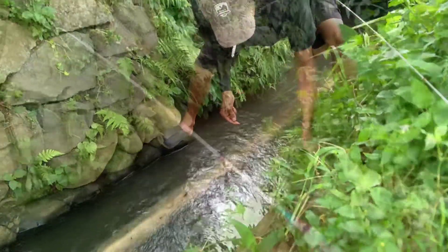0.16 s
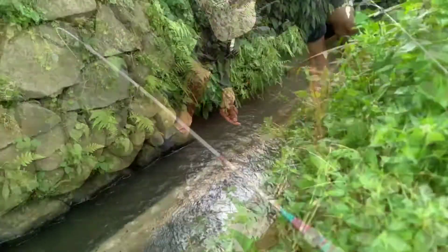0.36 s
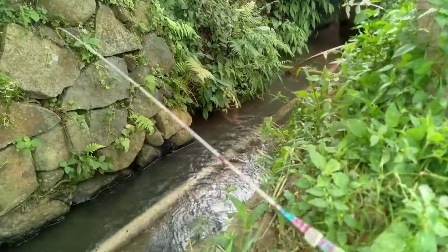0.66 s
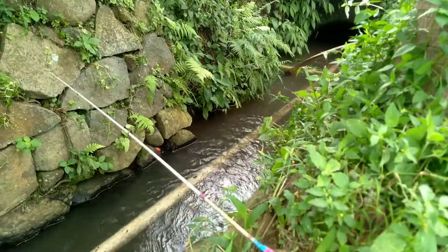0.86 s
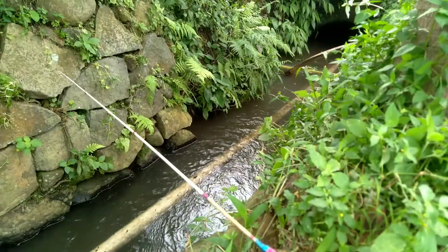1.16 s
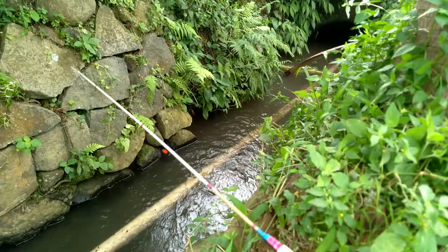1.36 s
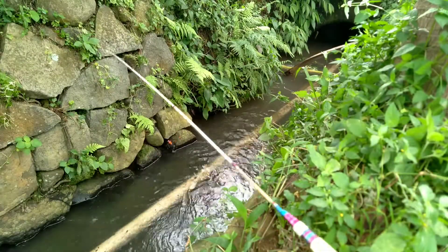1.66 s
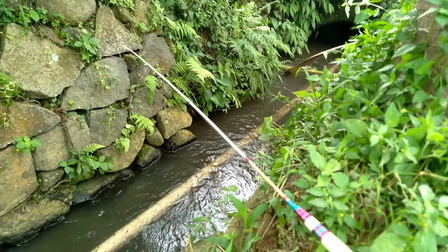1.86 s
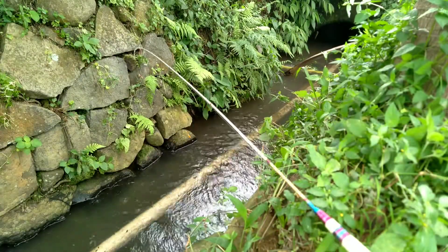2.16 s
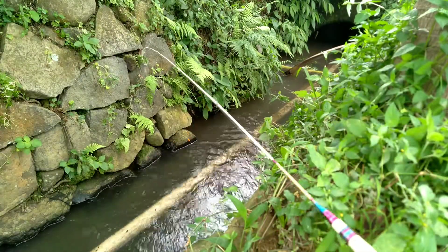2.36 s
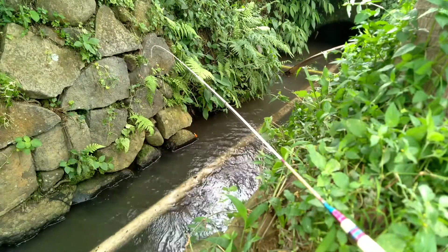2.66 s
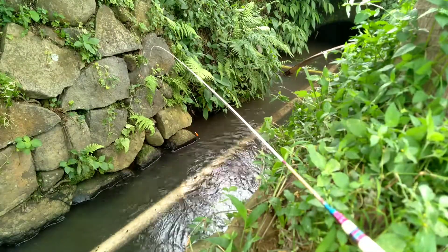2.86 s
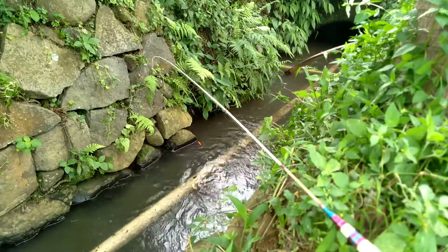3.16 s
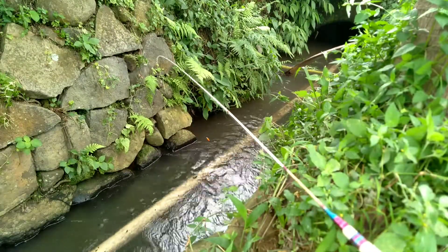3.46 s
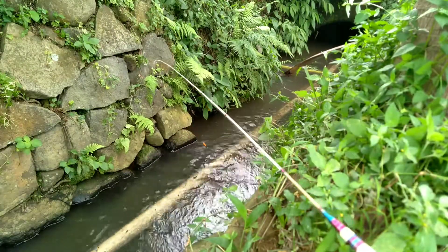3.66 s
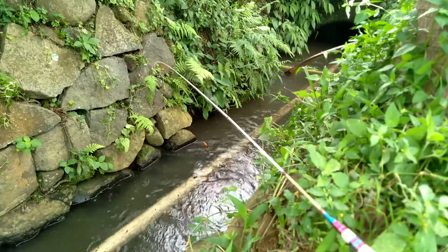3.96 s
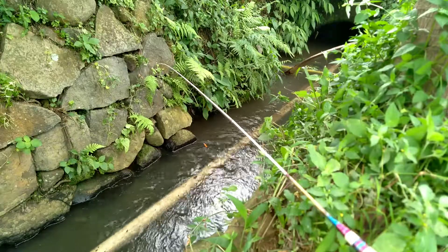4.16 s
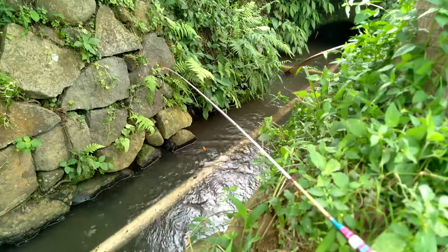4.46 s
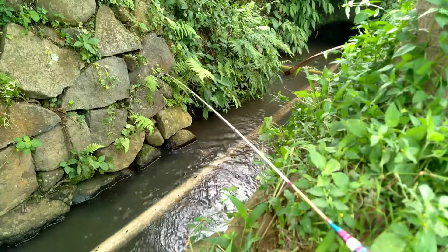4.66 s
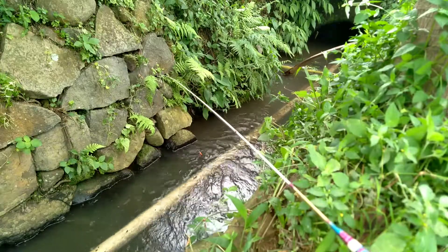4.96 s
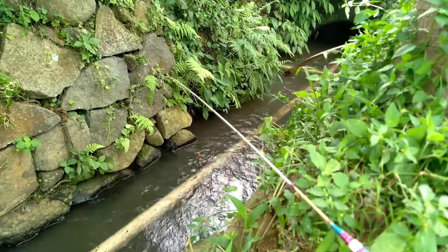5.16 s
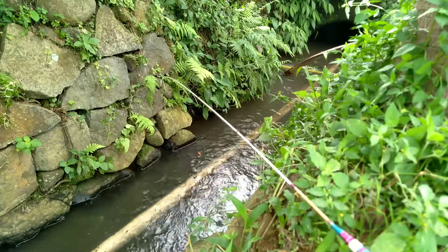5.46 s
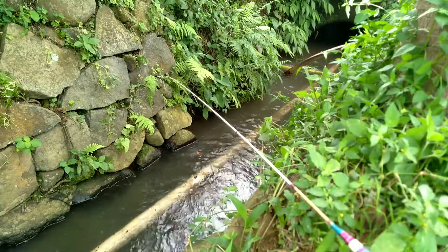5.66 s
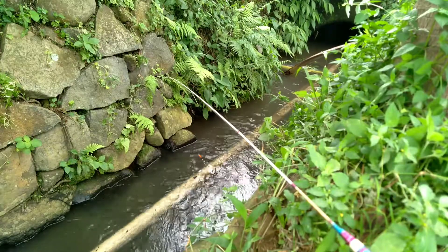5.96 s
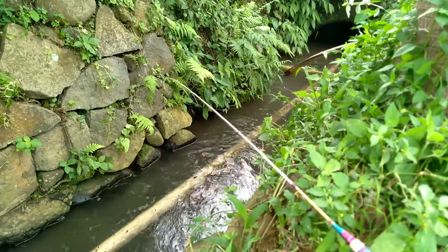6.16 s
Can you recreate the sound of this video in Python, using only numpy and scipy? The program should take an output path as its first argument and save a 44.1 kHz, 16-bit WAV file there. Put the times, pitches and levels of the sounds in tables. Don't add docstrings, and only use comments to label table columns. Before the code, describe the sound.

Outdoors at a stone-walled ditch, the sound fades in over a second: dense high cicada hiss, a constant thin electronic whine and dull, low water rumble. A hollow rod knocks against stone in a quick cluster just after one second. Faint drips, line ticks, distant peeps and two short falling bird whistles follow, while a far engine drone pulses weakly. The microphone is close to the rod, with the birds and engine far off.

```python
import sys
import numpy as np
from scipy import signal
from scipy.fft import rfft, irfft, next_fast_len
from scipy.io import wavfile
from scipy.ndimage import uniform_filter1d, map_coordinates

SR = 44100
rng = np.random.default_rng(int(sys.argv[2]) if len(sys.argv) > 2 else 0)


def transcribe(signal):
    frames = np.atleast_2d(signal).T
    limited = np.clip(frames, -1, 1)
    pcm = np.round(limited * 32767).astype(np.int16)
    wavfile.write(sys.argv[1], SR, pcm)


def voltage_ratio(decibels):
    exponent = np.asarray(decibels, float) / 20
    return 10 ** exponent


N = 278287
FADE_S = 1.01

# time_s, level_db
CICADA_LEVEL = [(0, -44), (.6, -41.5), (1.1, -42), (1.41, -44), (2.05, -41.5), (2.6, -41.5), (3.16, -42.5),
                (3.86, -41), (4.3, -44), (4.73, -41), (5.1, -41), (5.45, -41), (5.75, -42), (6.13, -40),
                (6.31, -42)]
# peak_s, strength_db
CICADA_CRESTS = [
    (-.2, 4.5),
    (1.1, 3.5),
    (2.36, 3),
    (3.66, 2.6),
    (4.98, 3),
    (6.2, 3),
]
# time_s, rumble_db
FLOW_SURGE = [(0, -48), (.4, -51), (.67, -48.5), (1.11, -53), (1.35, -49.5), (2.2, -49.5), (2.49, -52.5),
              (2.67, -49), (2.92, -51.5), (3.34, -47), (4.05, -51), (4.3, -44), (4.47, -52), (4.8, -49),
              (5.2, -50), (5.68, -49), (5.9, -51), (6.31, -50.5)]
# freq_hz, density_db
RUMBLE_SPECTRUM = [(12, -40), (20, -32.5), (32, -21.5), (81, -1), (119, 1.5), (141, -0.5), (162, -9),
                   (195, -12.5), (260, -22.5), (340, -51.5), (570, -120)]
# freq_hz, density_db
WASH_SPECTRUM = [(90, -73), (150, -2.5), (200, 0.5), (260, -5.5), (330, -16), (420, -29.5), (600, -63.5)]
# freq_hz, density_db
HISS_SPECTRUM = [(210, -40), (350, -9.5), (620, -10.5), (960, -11), (2000, -14.5), (4000, -16.5),
                 (5700, -18), (7000, -14.5), (7900, -12.5), (8500, -7.5), (10300, -23)]
# peak_s, length_s, level_over_wash_db
WASH_SWELLS = [(.25, 0.23, 15), (0.694, 0.31, 13.5), (1.225, .1, 13.5), (1.498, .3, 8.5), (1.95, .1, -1),
               (2.35, 0.41, 9.5), (3.35, 0.37, 4), (4.17, 0.11, 8.5), (5.3, 0.22, 4.5), (5.9, 0.25, 5)]
# start_s, blow_db, rattle_db, rattle_t60_s
ROD_KNOCKS = [
    (1.126, -30, -51.5, 0.24),
    (1.1482, -44, -57.5, 0.34),
    (1.2424, -26, -49.5, .3),
    (1.334, -40, -53.5, 0.23),
    (1.392, -47, -60.5, 0.24),
]
# centre_hz, width_hz, level_db
BUTT_MODES = [(272, 127, 3.5), (607, 420, -3.5), (1306, 330, -11.5), (3310, 150, -12), (3630, 210, -14),
              (4100, 120, -22), (4630, 210, -19), (4940, 63, -8.5), (5630, 210, -16.5), (6400, 420, -12),
              (7000, 270, -9), (8280, 130, 0), (8600, 200, -9)]
SHAFT_MODES = [(270, 210, -2), (407, 230, -1.5), (643, 330, 1), (1470, 490, -15), (2043, 210, -8),
               (2520, 360, -11.5), (3790, 270, -14), (4440, 190, -16), (5230, 400, -25), (6260, 350, -12),
               (7100, 93, -8.5), (8540, 930, -9)]
TIP_MODES = [(440, 220, -4.5), (1874, 110, -4.5), (3830, 115, -2.5), (5000, 160, -19), (6410, 400, -3.5),
             (6980, 250, -9), (8300, 260, -2)]
GRIP_MODES = [(434, 160, 3), (1900, 120, -20), (6250, 300, -7)]
# start_s, pitch_hz, width_hz, level_db
LINE_TICKS = [(.323, 9330, 1600, -45), (.327, 7650, 200, -67), (.33, 14700, 503, -66),
              (.333, 13000, 605, -66), (1.128, 13270, 100, -80), (1.145, 14360, 80, -81),
              (1.24, 10710, 150, -68), (2.497, 5850, 1200, -81), (4.082, 4515, 160, -57.5),
              (4.747, 8400, 350, -65), (5.746, 2910, 200, -63)]
# start_s, pitch_hz, level_db, t60_s
WATER_DRIPS = [(.024, 490, -58, .2), (1.697, 570, -67, 0.11), (1.712, 1910, -76.5, 0.029),
               (2.35, 470, -76, .088), (3.059, 279, -57, 0.13), (3.611, 918, -64.5, 0.06),
               (3.885, 883, -80, .08), (5.101, 880, -70, 0.055), (5.16, 2310, -72.5, 0.23),
               (5.432, 583, -78, .11), (5.578, 2070, -74, 0.11), (5.624, 860, -70, .3),
               (5.662, 272, -60.5, .095), (5.725, 847, -76, .1), (5.748, 2740, -67.5, .2),
               (6.099, 1150, -69.5, .09), (6.108, 810, -70.5, .038)]
# start_s, length_s, start_hz, end_hz, level_db
BIRD_SLIDES = [(4.433, .07, 6840, 6710, -60), (4.442, .035, 6800, 5470, -57.5),
               (4.469, 0.045, 5620, 5500, -60), (4.483, 0.014, 5900, 5830, -46.5),
               (4.48, 0.029, 6600, 5500, -60.5), (6.147, 0.029, 7460, 7150, -63),
               (6.157, .04, 7500, 6800, -54), (6.192, 0.057, 7494, 6100, -58),
               (6.179, .03, 6980, 6770, -53.5), (6.192, 0.055, 6660, 6450, -66),
               (6.185, 0.035, 6250, 6080, -43.5), (6.218, 0.0373, 6160, 5510, -51.5),
               (6.257, .045, 5720, 4960, -56), (6.262, 0.038, 6050, 5730, -50.5)]
# start_s, pitch_hz, level_db, hold_s
BIRD_PEEPS = [(1.668, 4560, -82.5, 0.026), (1.82, 5960, -72, .011), (1.864, 3570, -77.5, 0.021),
              (3.432, 5620, -85, 0.045), (3.468, 7560, -73, .008), (3.52, 5580, -73.5, .014),
              (3.552, 6300, -75, 0.059), (3.562, 8270, -71.5, .016), (3.705, 5150, -83, .03),
              (3.999, 7950, -59, .015), (4.048, 7970, -65, .095), (4.235, 7960, -66.5, .036),
              (4.349, 7970, -63, 0.03), (4.582, 3830, -70.5, 0.0077), (4.869, 6250, -72, .02),
              (4.88, 7100, -65, 0.12), (4.935, 7750, -78.5, .012), (4.99, 7700, -78.5, .015),
              (5.34, 7950, -79, .025), (5.763, 3670, -80, .006), (5.765, 3920, -81, .04),
              (6.257, 3500, -77, .043), (6.298, 3470, -65, .02)]
# peak_s, build_s, pitch_hz, level_db
ENGINE_SWELLS = [(.45, .45, 111, -51), (1.46, 0.64, 113.5, -46), (2.9, 1, 126.3, -47), (3.3, 0.18, 53, -52),
                 (4.1, 0.48, 132.5, -48.5), (4.33, 0.17, 77.2, -46), (6.101, 1.12, 97.3, -44.5)]


def unit(x):
    return x / np.sqrt(np.mean(np.abs(x) ** 2) + 1e-20)


def curve(rows):
    time_s, value = np.transpose(rows)
    return np.interp(np.arange(N) / SR, time_s, value)


def wobble(rate_hz, size):
    knots = rng.standard_normal(int(size / SR * 2000) + 4)
    return map_coordinates(knots, [np.arange(size) * np.clip(rate_hz, 0, 1999) / SR])


def filtered(x, response):
    m = next_fast_len(len(x) + 8192)
    return irfft(rfft(x, m) * response(np.fft.rfftfreq(m, 1 / SR)), m)[:len(x)]


def rush(response, patchy_db):
    z = signal.stft(rng.standard_normal(N + 512), nperseg=512)[2]
    field = uniform_filter1d(rng.standard_normal(z.shape), size=4, axis=0)
    field = uniform_filter1d(field, size=10, axis=1)
    patchy = signal.istft(z * voltage_ratio(patchy_db * unit(field)), nperseg=512)[1][:N]
    return unit(filtered(patchy, response))


def shape(points):
    f, db = np.transpose(points)
    return lambda hz: voltage_ratio(np.interp(np.log(hz + 1), np.log(f + 1), db))


def bell(centre_hz, spread_hz, steep):
    return lambda hz: np.exp(-np.abs((hz - centre_hz) / spread_hz) ** steep)


def add(track, start_s, sound):
    part = track[round(start_s * SR):][:len(sound)]
    part += sound[:len(part)]


def suppressed(x, floor_db):
    z = signal.stft(x, nperseg=512, noverlap=384)[2]
    power = uniform_filter1d(np.abs(z) ** 2, size=3, axis=0)
    power = np.abs(uniform_filter1d(power, size=12, axis=1))
    kept = power ** 2 / (power ** 2 + voltage_ratio(4.05 * floor_db))
    return signal.istft(z * kept, nperseg=512, noverlap=384)[1][:N]


def plinks(notes):
    out, t = np.zeros(N), np.arange(SR // 3) / SR
    for start_s, pitch_hz, width_hz, level_db, hold_s, t60_s in notes:
        echo = unit(wobble(width_hz, len(t)) + 1j * wobble(width_hz, len(t)))
        blur = np.clip(width_hz / 300 + t / 0.031, 0, 1)
        attack = 1 - np.exp(-(t / 0.0024) ** 2)
        accent = voltage_ratio(level_db + 3.0 + 1.5 * np.exp(-t / 0.0099))
        decay = voltage_ratio(-60 * np.maximum(t - hold_s, 0) / t60_s)
        tail = voltage_ratio(-15 - 60 * t / 0.33)
        tone = np.real((1 - blur + blur * echo) * np.exp(2j * np.pi * pitch_hz * t))
        add(out, start_s, attack * accent * (decay + tail) * tone)
    return out


def cicadas():
    rise_s, fall_s = .65, .48
    low_db, t = curve(CICADA_LEVEL), np.arange(N) / SR
    swell_db = np.max([db - 10 * np.abs((t - s) / np.where(t < s, rise_s, fall_s)) ** 2.7
                       for s, db in CICADA_CRESTS], axis=0)
    high_db = low_db + swell_db - 11 + 3.3 * (swell_db - 3.5) + 0.5
    crowd = rush(bell(centre_hz=9310, spread_hz=451, steep=2.8), patchy_db=0.64)
    crowd = signal.hilbert(crowd, next_fast_len(N))[:N]
    shift_hz = 9 * swell_db
    low = np.real(crowd * np.exp(2j * np.pi * np.cumsum(shift_hz) / SR))
    high = voltage_ratio(high_db) * rush(bell(centre_hz=9712, spread_hz=244, steep=1.23), patchy_db=3.0)
    return voltage_ratio(low_db) * suppressed(low + high / voltage_ratio(low_db), floor_db=-35)


def flow():
    wash_db, hiss_db, early_hiss_db = -69, -74, 3
    t = np.arange(N) / SR
    slop_db = np.max([db * np.exp(-((t - s) / length_s) ** 2) for s, length_s, db in WASH_SWELLS], axis=0)
    rumble = voltage_ratio(curve(FLOW_SURGE)) * rush(shape(RUMBLE_SPECTRUM), patchy_db=0.0)
    wash_level = voltage_ratio(wash_db + slop_db + 0.59 * wobble(16, N))
    wash = wash_level * rush(shape(WASH_SPECTRUM), patchy_db=2.5)
    hiss_level = voltage_ratio(hiss_db + early_hiss_db * np.clip(1 - t / FADE_S, 0, 1))
    hiss = hiss_level * rush(lambda hz: shape(HISS_SPECTRUM)(hz) * (hz < 10250), patchy_db=1.06)
    return rumble + wash + hiss


def ringing(modes):
    def response(f):
        total = 0
        for k, (centre_hz, width_hz, level_db) in enumerate(modes):
            damping = 1j * f * width_hz
            mode = (damping / (centre_hz * centre_hz - f * f + damping)) ** 2
            total = total + (-1) ** k * voltage_ratio(level_db) * mode
        return total * bell(centre_hz=0, spread_hz=9200, steep=12)(f)
    return response


def rod():
    out, t = np.zeros(N), np.arange(SR // 3) / SR
    parts = [BUTT_MODES, BUTT_MODES, SHAFT_MODES, TIP_MODES, GRIP_MODES]
    for (start_s, blow_db, rattle_db, t60_s), modes in zip(ROD_KNOCKS, parts):
        decay = voltage_ratio(-60 * t / t60_s) + 2.5 * voltage_ratio(-60 * t / 0.044)
        rattle = voltage_ratio(rattle_db + 18.5) * decay * rng.standard_normal(len(t))
        push = voltage_ratio(blow_db + 14) * np.exp(-((t - .0003) / .0001) ** 2)
        add(out, start_s, filtered(rattle - push, ringing(modes)))
    return out


def ticks():
    hold_s, t60_cycles = 0.011, 630
    return plinks([(s, hz, width_hz, db, hold_s, t60_cycles / hz) for s, hz, width_hz, db in LINE_TICKS])


def drips():
    width_hz, hold_s = 47, 0.016
    return plinks([(s, hz, width_hz, db, hold_s, t60_s) for s, hz, db, t60_s in WATER_DRIPS])


def whistles():
    calls, t = np.zeros(N), np.arange(SR // 3) / SR
    for start_s, length_s, start_hz, end_hz, level_db in BIRD_SLIDES:
        u = np.arange(round(length_s * SR)) / (length_s * SR)
        pitch_hz = start_hz + (end_hz - start_hz) * u
        envelope = voltage_ratio(level_db) * np.sin(np.pi * u) ** 0.47
        add(calls, start_s, envelope * np.sin(2 * np.pi * np.cumsum(pitch_hz) / SR))
    trees = rng.standard_normal(len(t)) * voltage_ratio(-60 * t / 0.31 - 20 * (t / 0.22) ** 3)
    echoes = signal.fftconvolve(calls, trees / np.linalg.norm(trees))[:N]
    return voltage_ratio(-5.0) * calls + voltage_ratio(3.5) * echoes


def peeps():
    width_hz, t60_s = 85, 0.1
    return plinks([(s, hz, width_hz, db, hold_s, t60_s) for s, hz, db, hold_s in BIRD_PEEPS])


def engine():
    beat_s, beat_db, dies_s, sag_hz_per_s = .39, 2.5, .11, 2
    out, t = np.zeros(N), np.arange(N) / SR
    for peak_s, build_s, pitch_hz, level_db in ENGINE_SWELLS:
        on = np.interp(t, [peak_s - build_s, peak_s, peak_s + dies_s], [0, 1, 0]) ** .45
        beating_db = beat_db * (np.cos(2 * np.pi * (t - peak_s) / beat_s) - 1)
        level = voltage_ratio(level_db + beating_db + 1.0 + 0.85 * wobble(6, N))
        hz = pitch_hz - sag_hz_per_s * (t - peak_s) + 1.435 * wobble(6, N)
        out += on * level * np.sin(2 * np.pi * np.cumsum(hz) / SR)
    return out


def whine():
    whine_hz, frames_hz, first_frame_s, level_db = 11730.615, 59.85, .0094, -41.5
    t = np.arange(N) / SR
    saw = ((t - first_frame_s) * frames_hz) % 1 - .5
    tone = np.cos(2 * np.pi * whine_hz * t + 1.4 * saw)
    tone = unit(filtered(tone, bell(centre_hz=11722, spread_hz=182, steep=2.3)))
    fuzz = voltage_ratio(-25) * rush(bell(centre_hz=11745, spread_hz=190, steep=2), patchy_db=1)
    level = voltage_ratio(level_db + 0.1 * wobble(25, N))
    return filtered(level * (tone + fuzz), bell(centre_hz=11720, spread_hz=310, steep=12))


def scene():
    near = cicadas() + flow() + rod() + ticks() + drips()
    far = whistles() + peeps() + engine()
    return (near + far + whine())[None]


def camera_gain():
    fade_from, settle_db, settle_s = 0.2, .5, 0.32
    jump_at_s, jump_db, jump_rise_s, jump_back_s = 4.47, 1.5, 0.018, 0.21
    t = np.arange(N) / SR
    fade = np.minimum(fade_from + (1 - fade_from) * t / FADE_S, 1)
    overshoot_db = settle_db * np.exp(-np.maximum(t - FADE_S, 0) / settle_s)
    jump_rise = np.clip((t - jump_at_s) / jump_rise_s + .5, 0, 1)
    excursion_db = jump_db * np.exp(-np.abs(t - jump_at_s) / jump_back_s) * jump_rise
    return fade * voltage_ratio(overshoot_db + excursion_db)


def band_limit(x):
    return signal.sosfilt(signal.butter(12, 15030, fs=SR, output="sos"), x)


def record(dry):
    mix = dry * camera_gain()
    return band_limit(mix)


dry = scene()
out = record(dry)
transcribe(out)
```